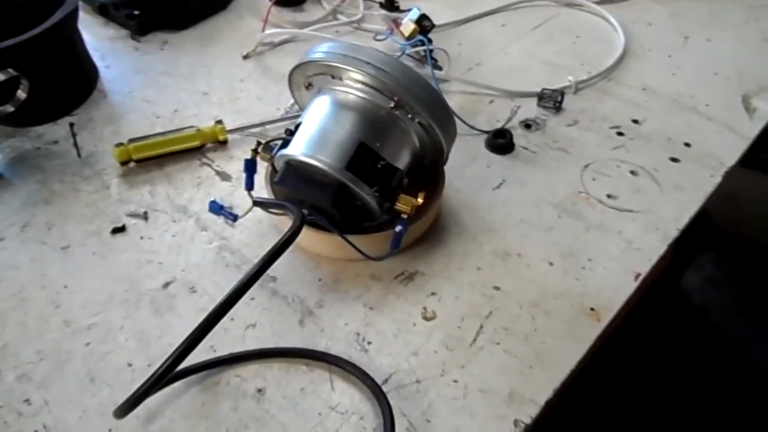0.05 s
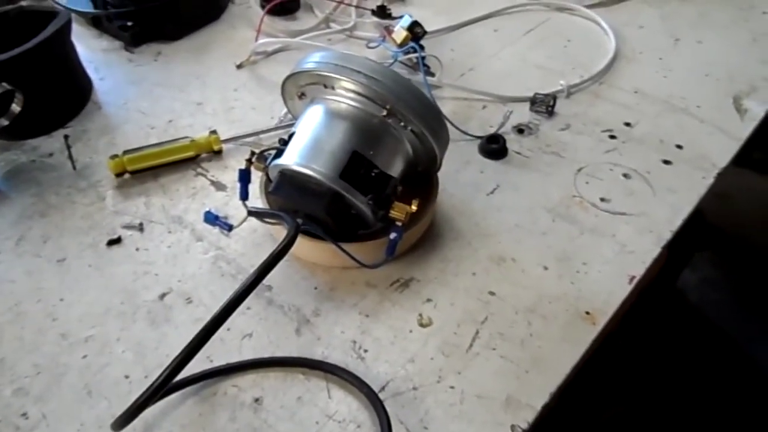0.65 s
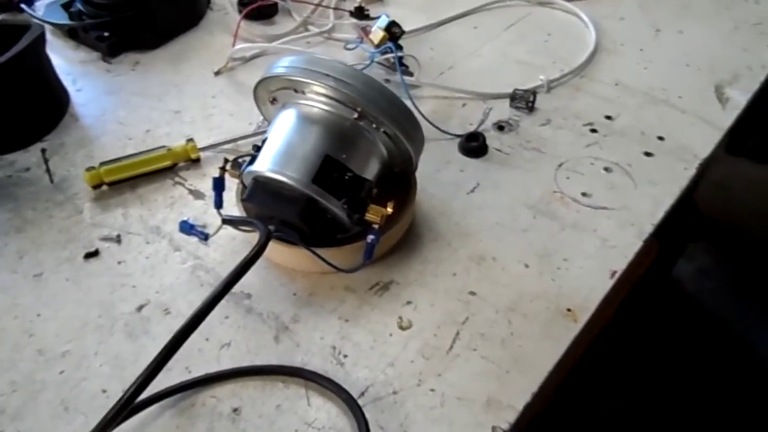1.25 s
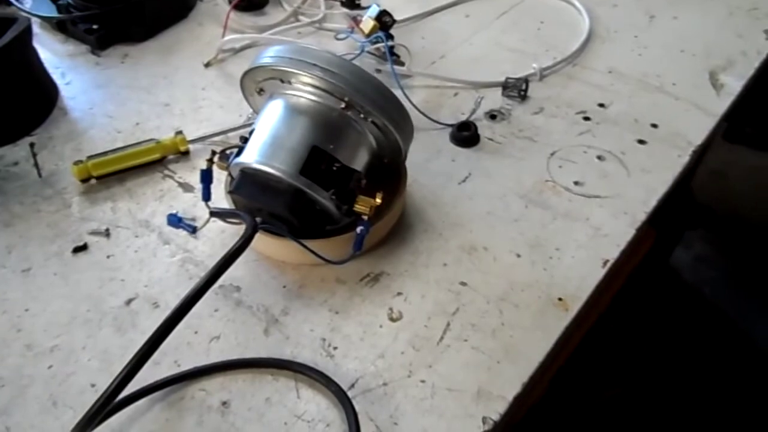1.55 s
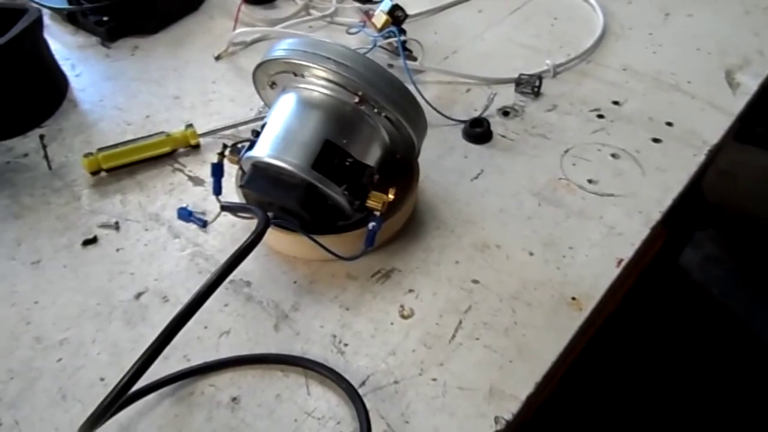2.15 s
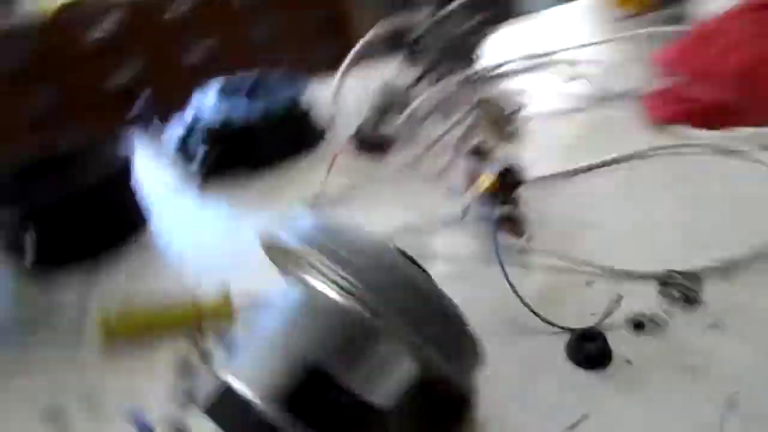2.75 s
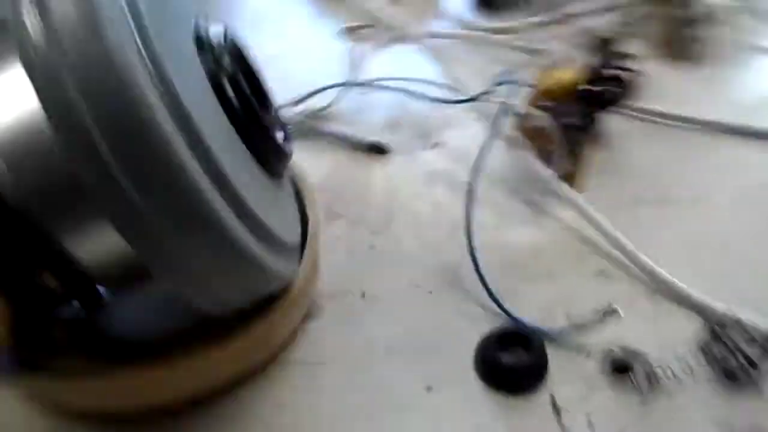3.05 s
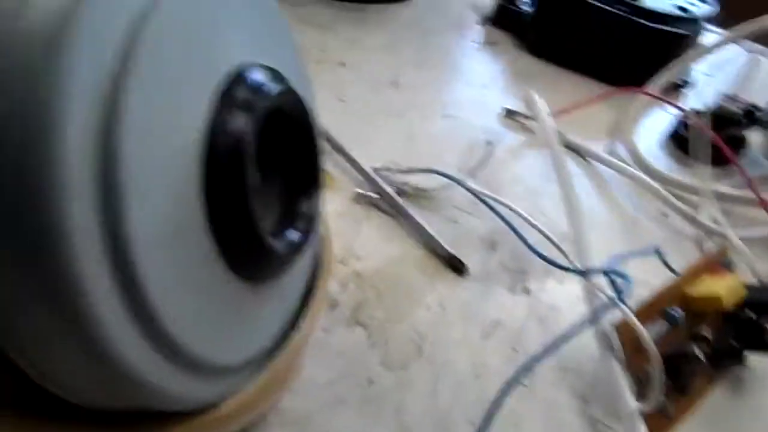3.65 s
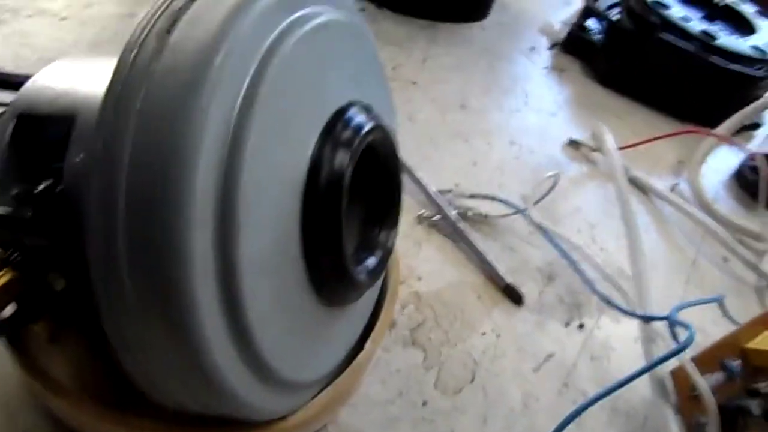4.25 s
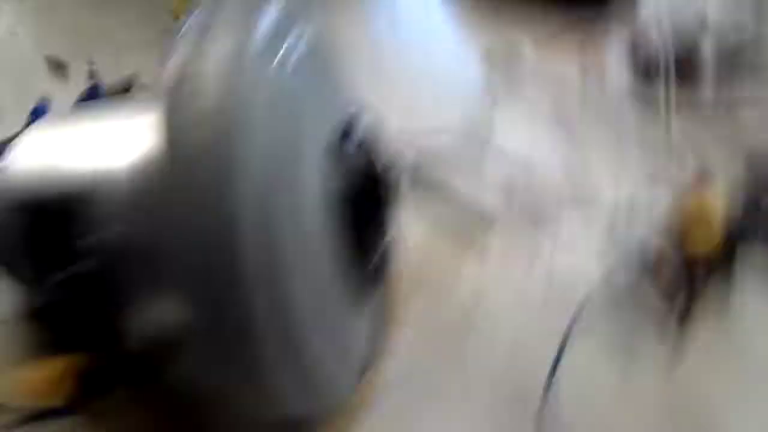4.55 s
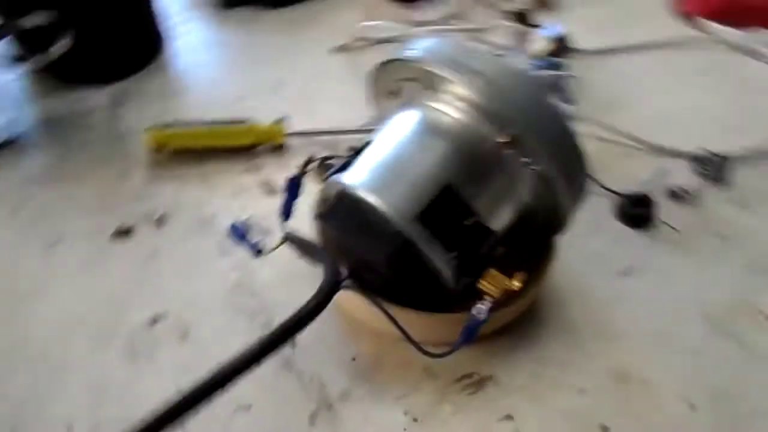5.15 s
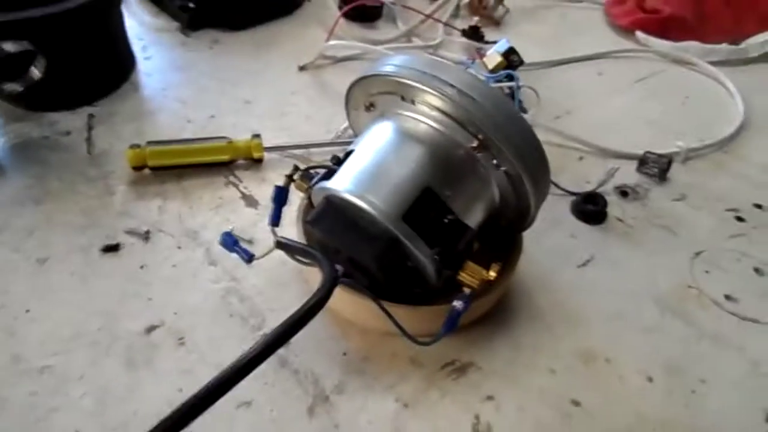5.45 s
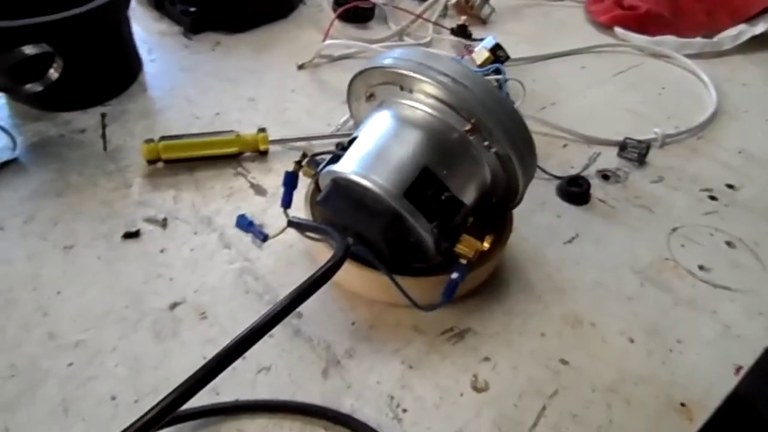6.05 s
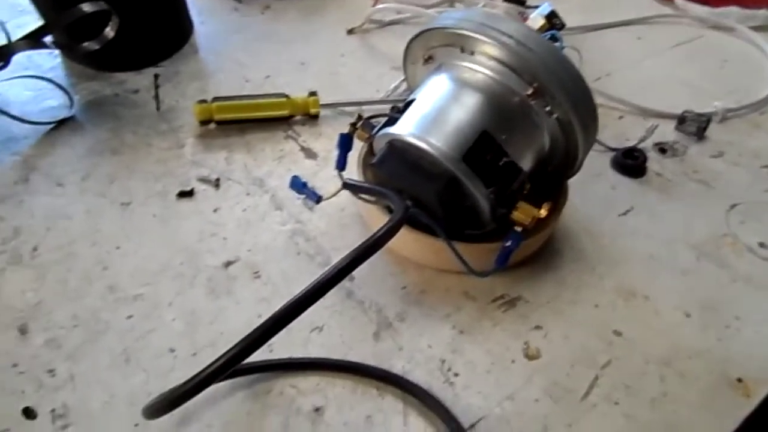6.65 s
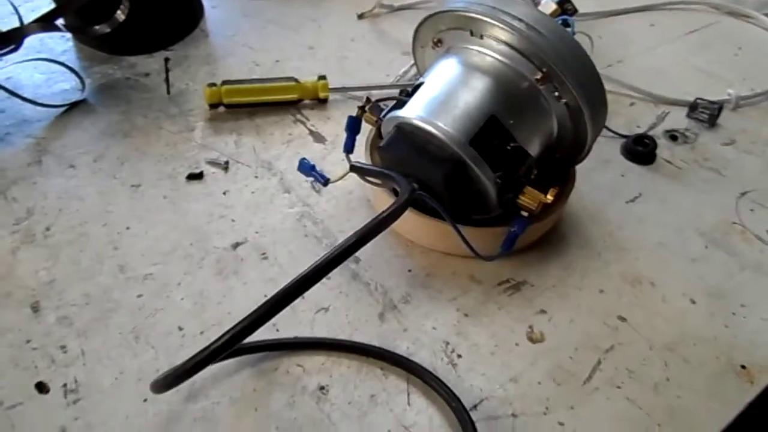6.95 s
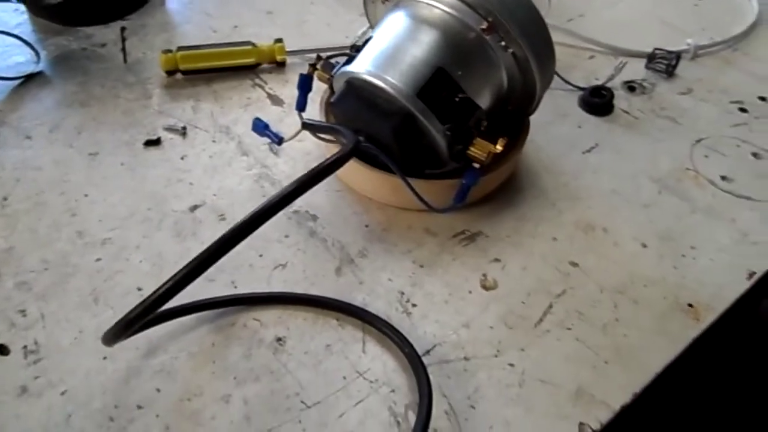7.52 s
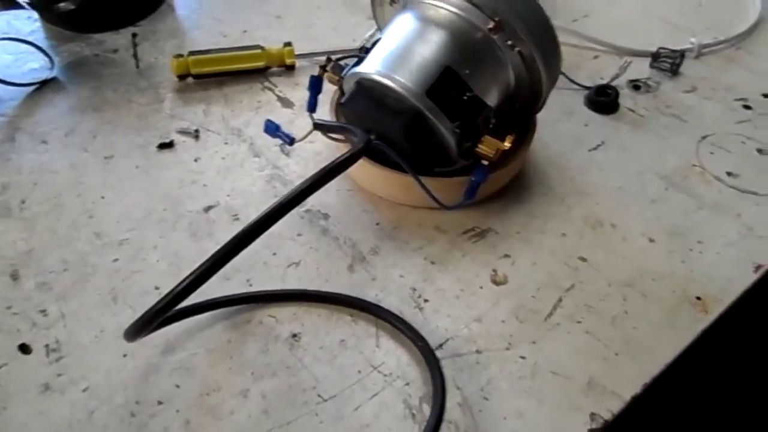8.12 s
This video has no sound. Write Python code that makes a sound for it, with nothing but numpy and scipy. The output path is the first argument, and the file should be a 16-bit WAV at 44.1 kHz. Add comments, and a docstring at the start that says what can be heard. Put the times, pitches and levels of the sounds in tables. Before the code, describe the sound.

A bare vacuum-cleaner motor whines at full speed, its exhaust buffeting the microphone, then is switched off and starts winding down.

```python
"""A bare vacuum-cleaner motor whines at full speed while its exhaust buffets a hand-held microphone.
The nine-blade impeller whistles, shaft orders buzz, and turbulent air rings the housing's resonances.
The buffeting eases while the microphone visits the intake side, and gain control ducks at the loudest
moments. Near the end the motor is switched off, and its tones fall as drag slows the rotor."""
import sys
import numpy as np
from scipy import signal
from scipy.fft import rfft, irfft
from scipy.io import wavfile
from scipy.ndimage import uniform_filter1d, minimum_filter1d, map_coordinates

SR = 44100
rng = np.random.default_rng(int(sys.argv[2]) if len(sys.argv) > 2 else 0)


def wav_record(signal):
    """Record a signal, one row per channel, as 16-bit PCM in the file named by sys.argv[1]."""
    frames = np.transpose(np.atleast_2d(signal))
    bounded = np.clip(frames, -1, 1)
    # unit amplitude maps onto the largest positive 16-bit level
    quanta = np.round(bounded * 32767).astype(np.int16)
    wavfile.write(sys.argv[1], SR, quanta)


N = 365148
TIME = np.arange(N) / SR
FREQ = np.maximum(np.fft.rfftfreq(N, 1 / SR), 1)
BLADES, SWITCH_OFF_S = 9, 7.143

# exhaust vortices that strike the microphone: t/s, strength/dB, core passage half-time/s
VORTICES = [(0.158, -14, 0.00055), (0.505, -3, 0.00082), (.517, -5.5, 0.0013), (0.7, -3.5, 0.0017),
            (1.24, -4, 0.0011), (1.479, -8, 0.0019), (1.654, -16, 0.0016), (1.909, -7.5, 0.0015),
            (2.348, -5.5, 0.00059), (2.844, -6.5, 0.0065), (5.151, 0, 0.00078), (5.619, -11.5, 0.00081),
            (6.08, -6.5, 0.0013), (7.49, -7.5, 0.0011)]


def undb(db):
    """Amplitude ratio: a factor of ten for every 20 dB."""
    return 10 ** (np.asarray(db) / 20)


def curves(table):
    """Linear interpolation in time of each column after the first."""
    times, *columns = np.transpose(table)
    return [np.interp(TIME, times, column) for column in columns]


def bump(centre_s, half_s):
    """Gaussian pulse of unit height."""
    return np.exp(-((TIME - centre_s) / half_s) ** 2)


def swells_db(table):
    """Superposition of brief swells and dips in level."""
    return sum(db * bump(s, half_s) for s, half_s, db in table)


def colour(points):
    """Spectral envelope: levels interpolated over log frequency, returned as gains."""
    hz, db = np.transpose(points)
    return undb(np.interp(np.log(FREQ), np.log(hz), db))


def noise(gain):
    """Spectral shaping of white noise; gain is the amplitude per root hertz."""
    return irfft(rfft(rng.standard_normal(N)) * gain, N) * np.sqrt(SR / 2)


def walk(rate_hz):
    """Random modulation: ramps between values drawn at rate_hz, with a spread near 1."""
    step = max(int(SR / rate_hz), 2)
    stairs = np.repeat(rng.standard_normal(N // step + 2), step)
    return 1.4 * uniform_filter1d(stairs, step)[:N]


def lowpass(x, hz):
    """Zero-phase low-pass: one pole, run forwards and backwards."""
    return signal.sosfiltfilt(signal.butter(1, hz, fs=SR, output="sos"), x)


def coasting():
    """Ramped step: 0 under power, 1 once the current is off."""
    return np.clip((TIME - SWITCH_OFF_S) * 20, 0, 1)


def shaft_speed(release_s=.064, coast_s=2.04, exponent=1.62):
    """Aerodynamic drag: once the drive dies away, the rotor's speed decays by a power law."""
    # rotation under power: t/s, f/Hz
    powered = [(0, 348.3), (0.2, 350.2), (0.5, 351), (1, 351.3), (2.6, 351.2), (3, 351.5), (3.5, 350.9),
               (4.5, 350.7), (5.15, 350.5), (5.6, 351.1), (6.1, 351.5), (6.6, 351.3), (7.1, 350.8)]
    off_s = np.maximum(TIME - SWITCH_OFF_S, 0)
    braked_s = off_s - release_s * (1 - np.exp(-off_s / release_s))
    return curves(powered)[0] / (1 + braked_s / coast_s) ** exponent


def shaft_angle(speed_hz, ripple_hz=100):
    """Torque ripple: each half cycle of the mains nudges the phase of the powered rotor."""
    ripple = .005 * np.sin(2 * np.pi * ripple_hz * TIME)
    return 2 * np.pi * np.cumsum(speed_hz) / SR + ripple * (1 - coasting())


def swept_db(hz):
    """Frequency response: while the rotor coasts, a falling tone crosses resonances and notches."""
    # peaks and notches: f/Hz, half-width/Hz, level/dB
    features = [(1860, 260, 8.5), (3220, 55, 4), (3795, 90, 9.5), (4200, 310, -6.5), (5360, 170, -13.5),
                (5600, 70, 5), (6160, 70, -12), (7600, 410, -16), (9100, 610, 13.5)]
    grid = np.linspace(0, SR / 2, 2048)
    response_db = sum(db * np.exp(-((grid - f) / half_hz) ** 2) for f, half_hz, db in features)
    return coasting() * np.interp(hz, grid, response_db)


def rushing_air(intake, speed_hz, split_hz=2500, darken=0.18, flicker_db=0.93):
    """Cavity resonance: turbulence rings the housing; intake and vents favour different modes."""
    # broadband turbulence: f/Hz, relative spectral level/dB
    rush_spectrum = [(100, -52), (370, -40), (520, -33.5), (850, -33.5), (1550, -37.5), (2300, -40),
                     (4200, -41), (7000, -38), (7600, -46), (10500, -42.5), (13500, -38), (15700, -41.5)]
    # air modes: f/Hz, nominal width/Hz, relative spectral level/dB, change at the intake/dB
    modes = [(556, 43, -27, -4), (659.5, 63, -24.5, -6.5), (943, 30, -31.5, -8.5), (1253, 260, -35.5, -6),
             (1972, 262, -31.5, -2.5), (2660, 456, -32, -5.5), (3100, 430, -32, -3.5),
             (3756, 270, -36, 7.5), (4200, 380, -60, 24.5), (4860, 580, -33.5, -12), (5340, 210, -48, -7),
             (6510, 930, -37, 0.5), (9280, 1600, -43, 3.5)]
    rush = noise(colour(rush_spectrum))
    for hz, width_hz, db, intake_db in modes:
        band = noise(1 / (1 + ((FREQ - hz) / (0.78 * width_hz)) ** 2))
        rush += band * undb(db + intake_db * intake + flicker_db * walk(25))
    roar = lowpass(rush, split_hz)
    hiss = rush - roar
    return hiss + roar * (speed_hz.max() / speed_hz) ** darken  # slower air sounds darker


def shaft_buzz(angle, speed_hz, flutter_hz=70, drift_db=2.2, sweep_db=1.8, comb_orders=76):
    """Periodic excitation: uneven blades and commutator bars sound harmonics of the shaft rate."""
    # prominent harmonics: order, relative level/dB, change when coasting/dB, flutter depth (0-1)
    orders = [(9, -8, 4, .6), (12, -19, 3, .3), (13, -16, -5, .3), (16, -8.5, -16, .2), (17, -10, -6, .25),
              (20, -15, 4, .2), (26, -20, 3, .2), (29, -21, -4, .2), (30, -21, 2, .2), (34, -22, -4, .3),
              (36, -13.5, 3, .3), (38, -18, -5, .3), (42, -21, 3, .3), (45, -15, 4, .4), (54, -20, 3, .4)]
    clear, unpowered = np.zeros(N), coasting()
    for k, db, coasting_db, flutter in orders:
        in_phase = (1 + flutter * walk(flutter_hz)) * np.sin(k * angle)
        quadrature = flutter * walk(flutter_hz) * np.cos(k * angle)
        partial = (in_phase + quadrature) / np.sqrt(1 + 2 * flutter ** 2)
        # standing waves: an order swells slowly as the hand drifts, quickly as its pitch sweeps
        standing_db = drift_db * walk(3.07) + sweep_db * unpowered * walk(12)
        level_db = db + 0.2 + coasting_db * unpowered + standing_db
        if k == BLADES:
            level_db += swept_db(k * speed_hz)
        clear += undb(level_db) * partial * (k * speed_hz < SR / 2)
    phases = rng.uniform(0, 2 * np.pi, comb_orders)
    comb = sum(np.sin(k * angle + phase) * (k * speed_hz < SR / 2) for k, phase in enumerate(phases, 1))
    faint = comb * undb(-29 + 5 * unpowered)
    return np.sqrt(2) * (clear + faint) * speed_hz / speed_hz.max()


def draught(small_db, split_hz=110, strong_db=-19, sputter_db=4, gust_db=2, gust_ceiling=0.6):
    """Wind noise: eddies press on the microphone, and stronger flow carries more small ones."""
    # exhaust flow at the microphone: t/s, level before the soft cap/dB
    flow = [(0, -22), (.5, -18), (.8, -21.5), (1.1, -19.5), (1.4, -21.5), (1.8, -17.5), (2.3, -22.5),
            (2.97, -20.5), (3.2, -39), (4.1, -38.5), (4.88, -41.5), (5.15, -17.5), (5.7, -24.5),
            (6.15, -19.5), (6.8, -28.5), (7.5, -19), (8.0, -45), (8.28, -55.5)]
    # lulls and puffs as the flow misses or catches it: t/s, half-length/s, change/dB
    wafts = [(.21, .03, -1), (.76, 0.029, -5), (1.052, 0.014, 7), (2.29, .02, -12), (3.473, 0.025, 9),
             (3.59, .06, -8), (3.758, 0.046, 5), (4.313, 0.027, 11), (6.735, .04, -17), (6.92, .02, 6),
             (7.004, 0.02, -8)]
    # turbulent pressure: f/Hz, relative spectral level/dB
    eddy_spectrum = [(8, -10.5), (30, 2.5), (70, -2), (130, -4.5), (200, -10), (320, -17.5), (500, -33.5),
                     (1000, -31), (3000, -80)]
    rise_db = gust_db * sum(bump(s, half_s=0.026) for s, _, _ in VORTICES)  # a gust around each vortex
    flow_db = curves(flow)[0] + swells_db(wafts) + rise_db
    calm_db = 0.62 * np.minimum(flow_db - strong_db, 0)
    eddies = noise(colour(eddy_spectrum))
    large = lowpass(eddies, split_hz)
    small = (eddies - large) * undb(small_db + rise_db + calm_db + sputter_db * (walk(110) - 0.5))
    pressure = (large + small) * undb(2 * walk(35))
    pressure = pressure / np.std(pressure) * undb(flow_db)
    return gust_ceiling * np.tanh(pressure / gust_ceiling)  # the strongest gusts are softly capped


def buffets(length_s=0.006):
    """Vortex passage: pressure swings from suction to push as a core crosses the microphone port."""
    pressure = np.zeros(N)
    for s, db, core_s in VORTICES:
        age_s = TIME - s - length_s / 2
        swing = 2 * age_s * core_s / (age_s ** 2 + core_s ** 2)
        pressure += undb(db) * swing * np.exp(-(age_s / length_s) ** 2)
    return pressure


def overtone_db(speed_hz, harmonic):
    """Standing waves: a blade-rate overtone dips as the microphone moves through its nodes."""
    # whistle along the microphone's path: t/s, second harmonic level/dB, third harmonic level/dB
    path_levels = [(0, -23.5, -31), (.4, -20.5, -31), (1.2, -22, -27.5), (1.9, -19.5, -32), (2.7, -19, -29),
                   (3.1, -13, -33.5), (3.4, -8.5, -26.5), (3.75, -10.5, -22), (4.65, -13, -29),
                   (4.95, -10, -19), (5.3, -25.5, -26), (5.75, -19.5, -31.5), (6.15, -23, -32.5),
                   (6.45, -18, -32.5), (7.1, -18, -35), (7.55, -17.5, -47), (7.85, -17.5, -34),
                   (8.28, -19.5, -50)]
    # pressure nodes: t/s, blade-rate harmonic, half-length/s, change/dB
    nodes = [(0.126, 2, 0.074, -20), (2.94, 2, 0.045, -1), (3.234, 2, 0.06, -13), (4.838, 2, 0.087, -17),
             (5.325, 2, 0.065, -5), (2.73, 3, .03, -13), (3.393, 3, 0.036, -12), (4.984, 3, 0.066, -19)]
    nodes_db = sum(db * bump(s, half_s) for s, k, half_s, db in nodes if k == harmonic)
    return curves(path_levels)[harmonic - 2] + nodes_db + swept_db(BLADES * harmonic * speed_hz)


def impeller_whistle(angle, speed_hz):
    """Blade-passing overtones; as they fall, their echoes are still higher and beat with them."""
    # reflections from nearby surfaces: delay/s, gain
    reflections = [(.0088, 0.051), (0.011, 0.31)]
    tone = np.zeros(N)
    for harmonic, flutter_db in (2, 0.43), (3, 0.86):
        level_db = overtone_db(speed_hz, harmonic) + flutter_db * walk(45)
        tone += undb(level_db) * np.sin(harmonic * BLADES * angle)
    echoes = sum(gain * map_coordinates(tone, [(TIME - delay_s) * SR], order=3)
                 for delay_s, gain in reflections)
    return np.sqrt(2) * (tone + coasting() * echoes)


def scene():
    """Superposition: motor and exhaust add at one moving microphone, alike in both channels."""
    # microphone path: t/s, exposure to the intake (0-1), change in small eddies/dB
    path = [(0, 0.2, 0), (1.2, 0.05, -2.5), (2, 0.3, 8.5), (2.8, 0.28, 5), (3.3, 0.73, 2), (4.3, 1, -19),
            (4.88, 1, -8), (5.3, .2, 8.5), (5.7, 0.05, 2), (6.3, 0, -4.5), (7.1, 0.1, -5), (8.28, 0.3, -26)]
    # the air swells as the microphone passes the housing's rim: t/s, half-length/s, rise/dB
    rim_passes = [(3.25, 0.058, 2.5), (4.91, 0.075, 2.4)]
    intake, small_db = curves(path)
    speed_hz = shaft_speed()
    angle = shaft_angle(speed_hz)
    octaves_down = np.log2(speed_hz.max() / speed_hz)
    hiss_db = -26 - intake - 2.3 * octaves_down
    rush = undb(hiss_db + swells_db(rim_passes)) * rushing_air(intake, speed_hz)
    buzz = undb(hiss_db - 0.5 * intake) * shaft_buzz(angle, speed_hz)  # shaded by the housing
    whistle = impeller_whistle(angle, speed_hz)
    mono = rush + buzz + whistle + draught(small_db) + buffets()
    return np.array([mono, mono])


def record(dry, ceiling_db=-11, sense_s=0.01, attack_s=.018, hold_s=0.12, recover_db_per_s=28,
           limit=0.57, top_hz=15700):
    """Automatic gain control: loud moments duck the gain; a limiter and a low-pass follow."""
    window, hold = int(sense_s * SR), int(hold_s * SR)
    level_db = 10 * np.log10(np.abs(uniform_filter1d(dry[0] ** 2, window)) + 1e-12)
    needed_db = np.minimum(ceiling_db - level_db, 0)
    held_db = minimum_filter1d(needed_db, hold, origin=(hold - 1) // 2, mode="nearest")
    climb_db = recover_db_per_s * TIME
    gain_db = np.minimum.accumulate(held_db - climb_db) + climb_db  # recovery at a steady rate
    ducked = dry * undb(uniform_filter1d(gain_db, int(attack_s * SR)))
    peak_gain = limit / np.maximum(np.abs(ducked[0]), limit)
    limited = ducked * uniform_filter1d(minimum_filter1d(peak_gain, window), window)
    return signal.sosfilt(signal.ellip(10, .2, 80, top_hz, fs=SR, output="sos"), limited)


dry = scene()
out = record(dry)
wav_record(out)
```